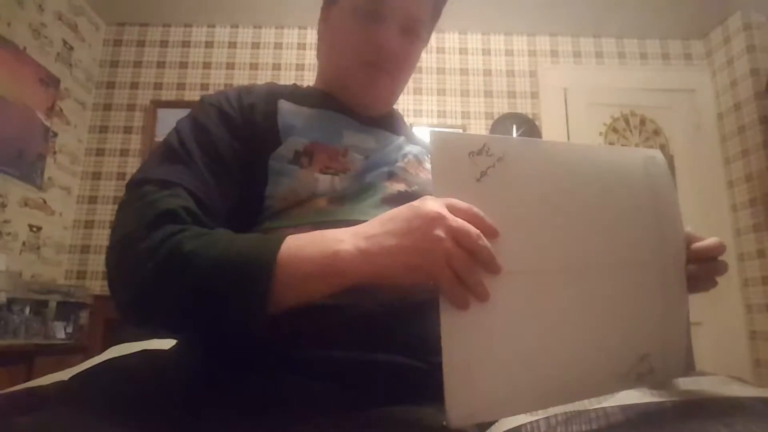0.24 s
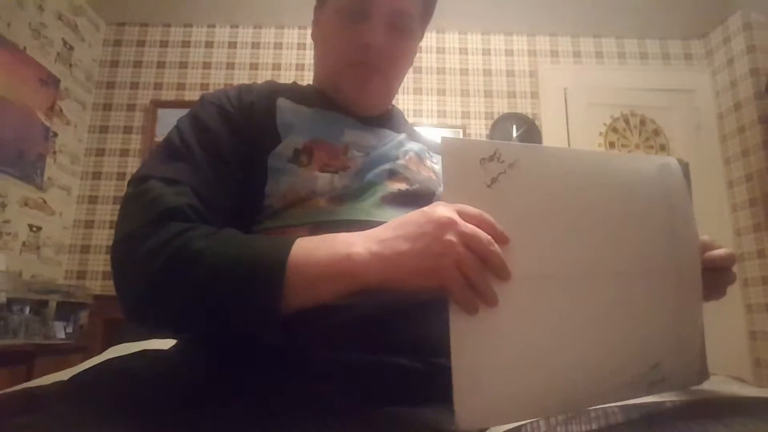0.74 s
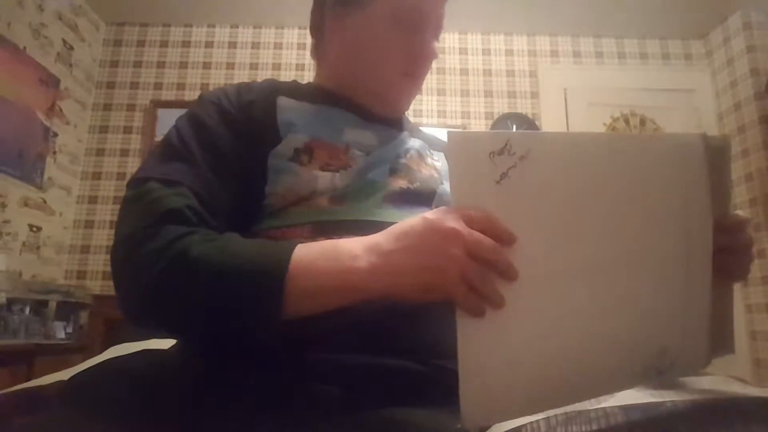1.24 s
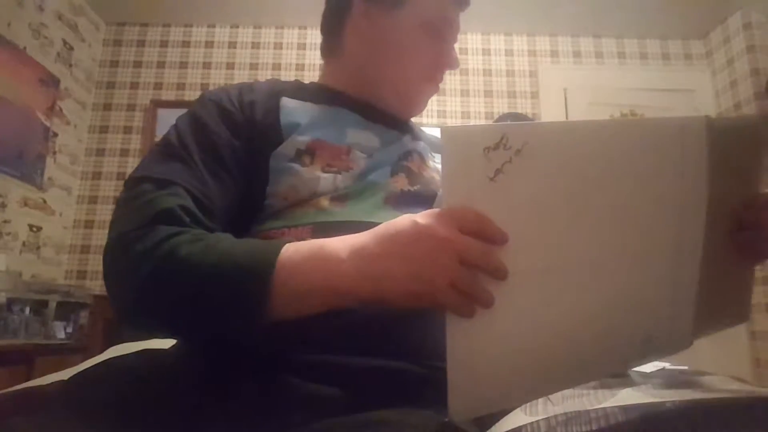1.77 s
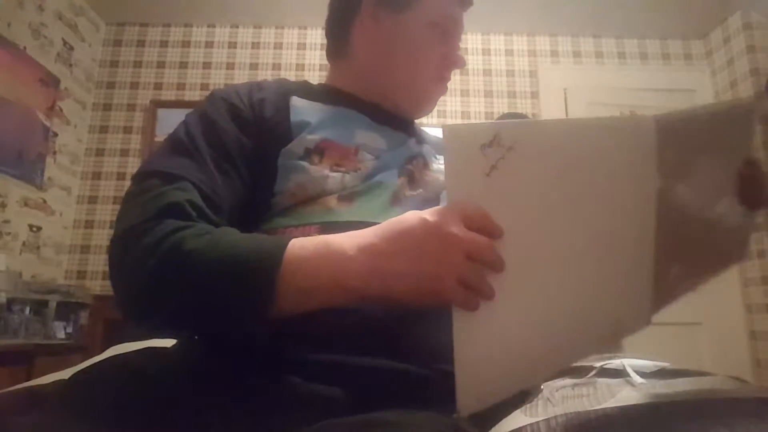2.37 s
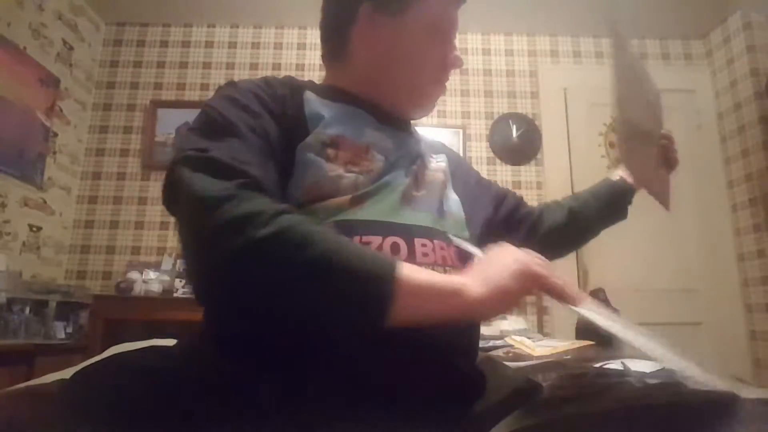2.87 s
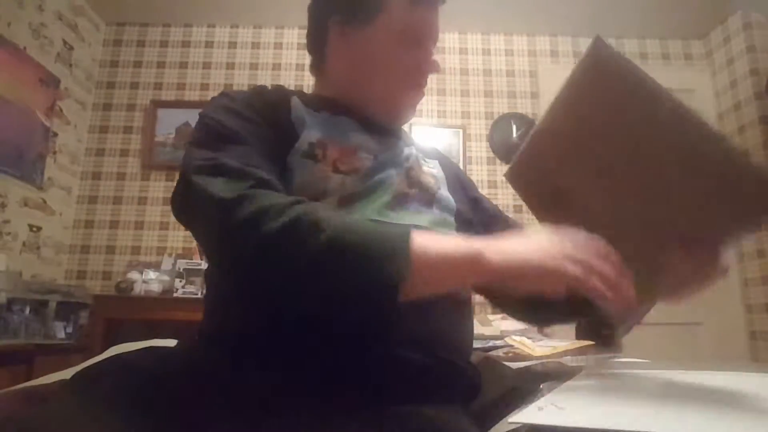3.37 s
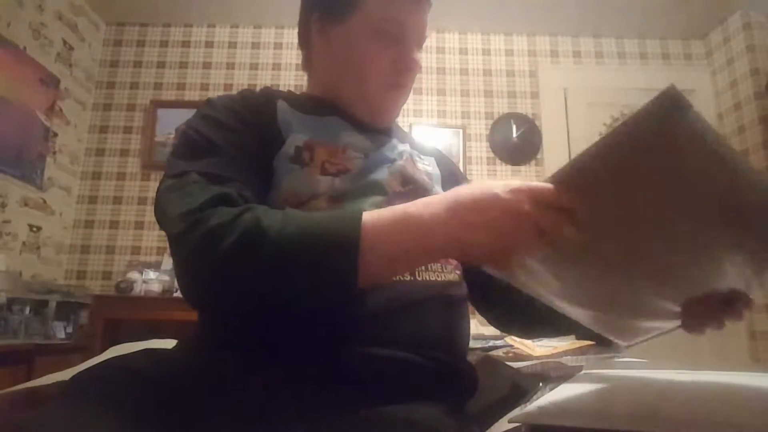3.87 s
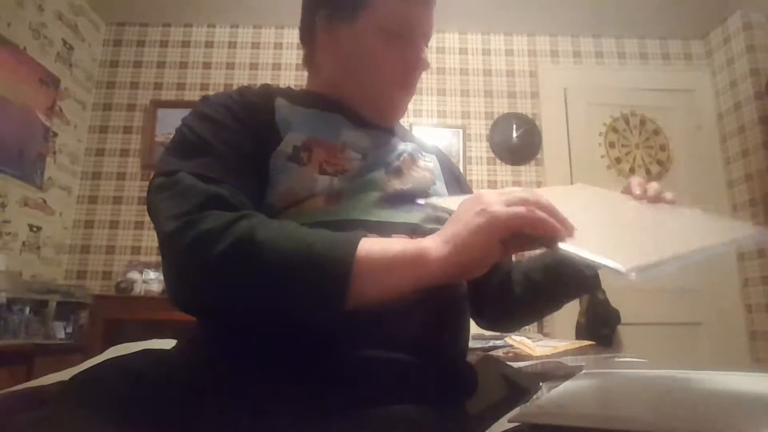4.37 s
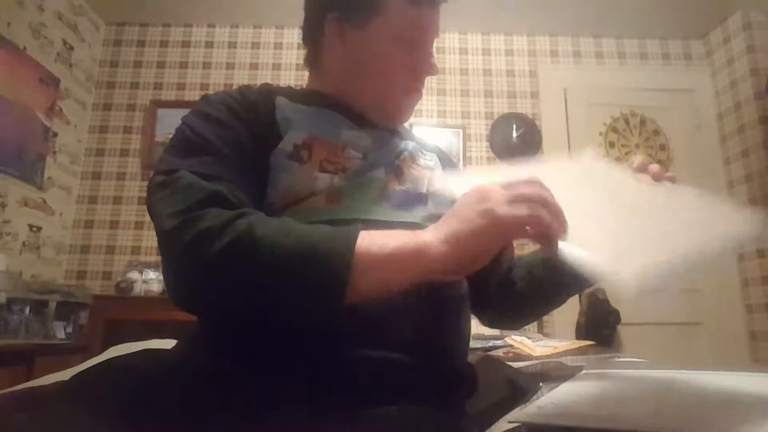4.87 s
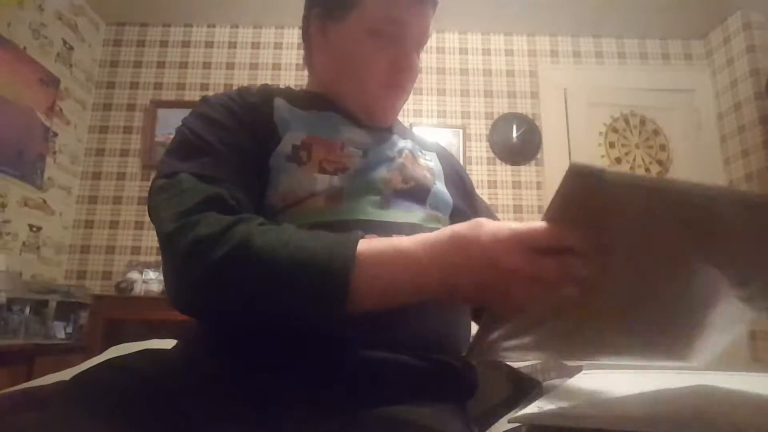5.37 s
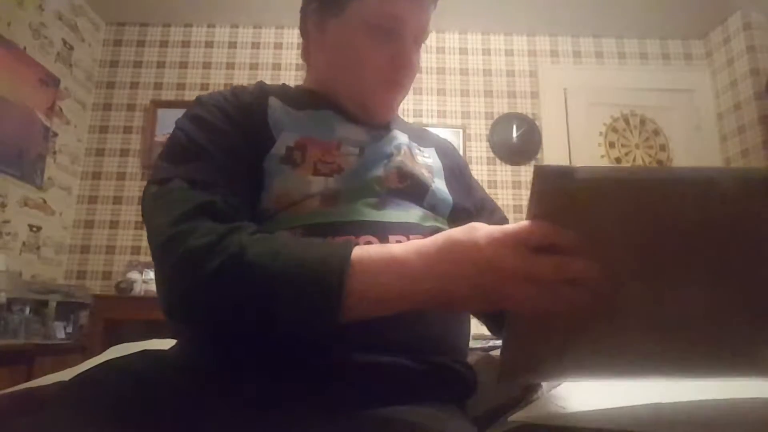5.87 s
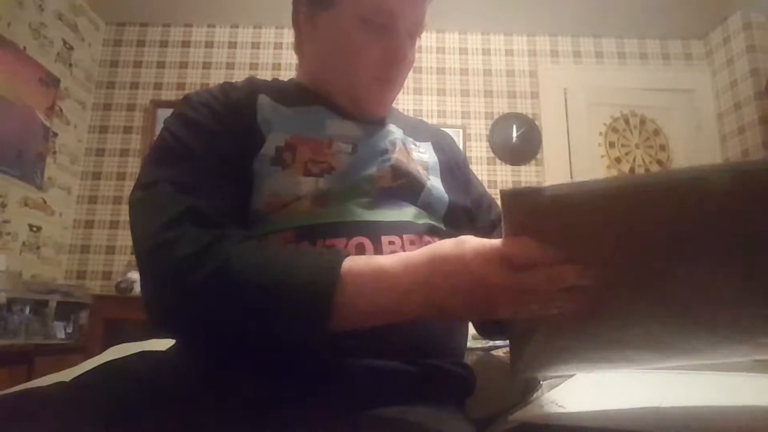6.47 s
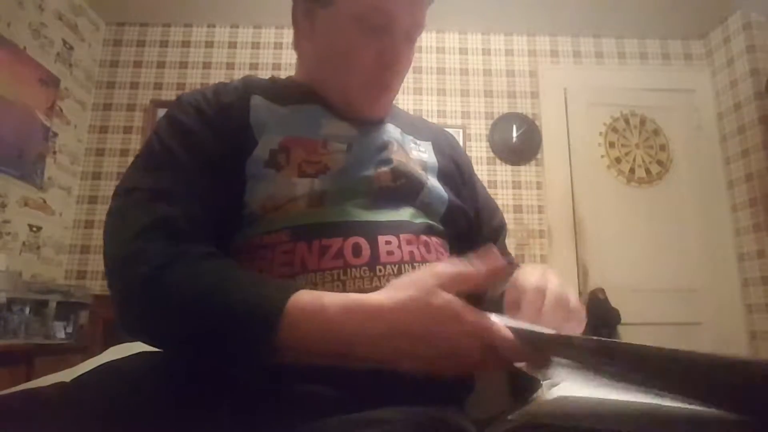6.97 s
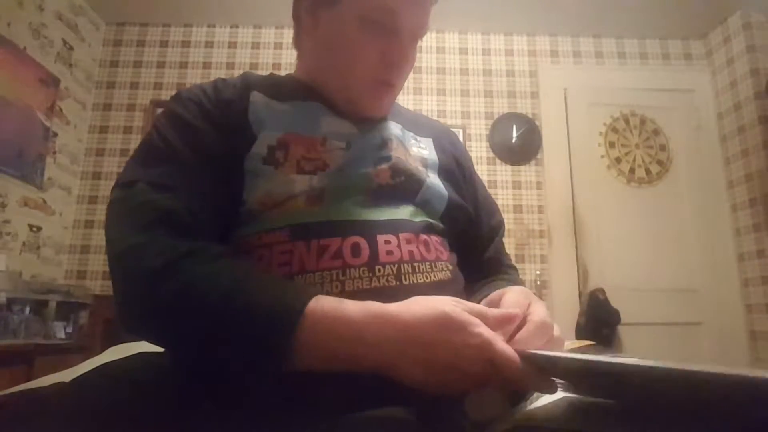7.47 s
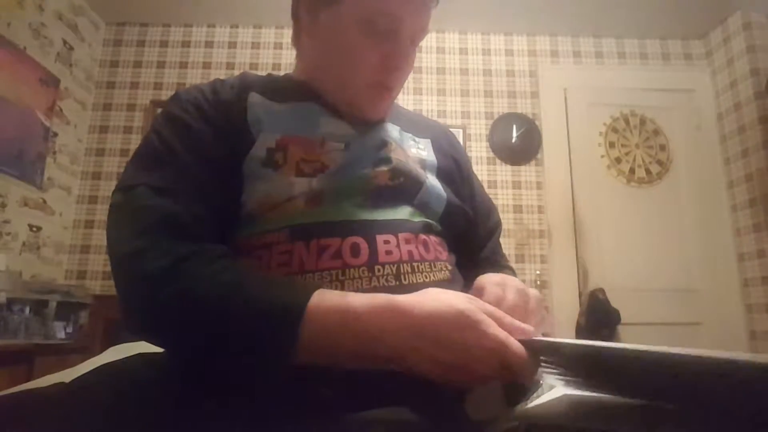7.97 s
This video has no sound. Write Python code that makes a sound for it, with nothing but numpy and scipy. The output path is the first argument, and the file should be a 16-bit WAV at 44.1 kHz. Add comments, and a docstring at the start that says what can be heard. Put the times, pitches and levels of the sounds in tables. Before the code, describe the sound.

Stiff card rustles and crackles as it slides out of a cardboard mailer, then is turned over and tapped in a small room.

```python
"""Small creases snap and fingers brush as a stiff card is handled in a small furnished room.
The card slides out of a cardboard mailer, which swishes down onto a blanket; then the card is turned
over, tapped and picked at. Stick-slip friction and cracking fibres drive the same board, air resonates
in the gap under the mailer, and soft blows ring low, damped notes. Two microphone ports hear it all
over room tone and a distant motor, and the left one pops once."""
import sys
import numpy as np
from scipy import signal
from scipy.fft import rfft, irfft, next_fast_len
from scipy.io import wavfile
from scipy.ndimage import uniform_filter1d, map_coordinates

SR = 44100
rng = np.random.default_rng(int(sys.argv[2]) if len(sys.argv) > 2 else 0)


def output_pcm(signal):
    """Save a mono or channel-first signal as 16-bit PCM at the path in sys.argv[1].

    Samples are clipped to [-1, 1] before scaling.
    """
    pcm = np.clip(np.atleast_2d(signal).T, -1, 1) * 32767
    wavfile.write(sys.argv[1], SR, np.round(pcm).astype(np.int16))


N = 362943

# Spectrum of the room tone and microphone hiss. Each row: frequency in Hz, relative density in dB.
TONE_SPECTRUM = [(20, -46), (52, -5.5), (200, -7), (440, -17.5), (600, -11.5), (1000, -18), (1400, -17.5),
                 (2300, -22), (3300, -18.5), (6500, -29.5), (10000, -43), (12800, -39), (15800, -25.5)]
# Likeness of that noise at the two ports. Each row: frequency in Hz, correlation from -1 to 1.
TONE_CORRELATION = [(60, 0.15), (240, 0.206), (950, -0.41), (3770, -0.48), (15000, -0.15)]
# Hum of a distant motor. Each row: frequency in Hz, resonator width in Hz, level in dB.
MOTOR_HUM = [(59, 45, -79), (118.3, 5.2, -81)]
# Short brushes of fingers and card. Each row: peak time in seconds, seconds to swell by 20 dB, seconds
# to fade by 20 dB, then relative levels in dB of friction, sheet flex, fibre hiss and silky sheen.
BRUSH_STROKES = [(0.0, .1, .3, -74, -58, -78, -78), (0.12, .15, .35, -60.5, -70, -75, -77),
                 (0.74, .15, .3, -57.5, -68, -72, -75), (0.95, .1, .2, -59, -61, -78, -78),
                 (1.07, .25, .25, -57, -62, -66.5, -65.5), (3.53, .3, .3, -71, -70, -80, -81),
                 (3.636, .004, .06, -49, -65, -50, -54), (3.815, .03, .05, -82, -74, -78, -73),
                 (3.96, .08, .22, -68, -78, -67, -61.5), (4.12, .07, .2, -60.5, -68, -70, -72),
                 (4.31, .3, .6, -71, -76, -73.5, -71.5), (4.98, .2, .28, -65, -76, -64.5, -62.5),
                 (5.26, .12, .12, -58, -64, -62, -66), (5.278, .016, .012, -40, -52, -52, -62),
                 (5.32, .06, .03, -53, -64, -64, -66), (5.345, .015, .09, -54, -68, -53, -57),
                 (5.53, .07, .14, -60, -62, -62, -62), (5.8, .4, .6, -71, -78, -74.5, -74),
                 (6.04, .08, .15, -64.5, -66, -73, -76), (6.16, .06, .11, -66, -61, -65, -68),
                 (6.27, .07, .09, -60, -68, -63.5, -65), (6.39, .06, .13, -68, -72, -70, -75),
                 (6.6, .08, .15, -64, -66, -72, -75), (6.71, .1, .1, -61, -66, -70, -73),
                 (6.88, .5, .3, -63, -63, -65, -66), (6.99, .08, .3, -64, -50, -61, -62),
                 (6.997, .016, .012, -42, -50, -50, -60), (7.17, .07, .05, -66, -60, -61, -64),
                 (7.22, .15, .22, -58, -61, -69, -73), (7.39, .1, .15, -62, -63, -73, -76),
                 (7.55, .1, .25, -68, -68, -78, -84), (7.66, .1, .12, -60, -64, -70, -74),
                 (7.96, .15, .3, -60, -58.5, -67, -69.5), (8.05, .2, .04, -62, -64, -65, -69),
                 (8.17, .1, .5, -66, -68, -79, -87)]
# Two long slides, one list each: card out of mailer, mailer onto blanket.
# Each row: time in seconds, then relative levels in dB of friction, flex, hiss and sheen.
SLIDE_PATHS = [
    [(1.21, -70, -62, -84, -85), (1.34, -54, -68.5, -70, -71), (1.78, -60.5, -68.5, -67, -65),
     (1.88, -57, -59, -62.5, -60.5), (1.99, -59.5, -62.5, -64, -61), (2.27, -56.5, -61.5, -64, -63),
     (2.38, -47, -52, -58, -58), (2.49, -62, -66, -57.5, -54.5), (2.53, -76, -80, -90, -92)],
    [(2.62, -66, -64, -78, -78), (2.69, -66, -64, -78, -76), (2.705, -57, -57, -63, -64),
     (2.79, -62, -72, -76, -78), (2.815, -60, -62, -63, -66), (2.89, -56, -63, -59.5, -62.5),
     (2.96, -49.5, -56.5, -59, -60), (3.05, -53, -60, -66.5, -68), (3.18, -61, -63, -78, -78),
     (3.34, -74, -78, -90, -90)],
]
# Colour of board and microphone. Each row: frequency in Hz, relative gain in dB.
BOARD_RESPONSE = [(50, -26), (130, -10.5), (360, -5), (550, -4), (700, -6.5), (950, -1), (1400, -4),
                  (2700, -7.5), (3400, -17), (4300, -19.5), (6600, -35.5), (8500, -32), (10000, -37.5),
                  (12600, -32.5), (14200, -39.5), (15800, -47)]
# Creases and film snapping. Each row: time in seconds, relative level in dB, panel note in Hz,
# bass, presence and treble in dB against the middle band, relative level of the crackle in dB.
CREASE_SNAPS = [(0.011, -36, 947, -8, -22, -22, -12), (0.033, -41, 613, -8, -0.5, -9, -24),
                (0.05, -39, 950, -6, -32, -35, -16), (0.361, -47, 1710, -10, -4, -14, -25),
                (0.416, -55.5, 806, -11, 8, 9, -24), (0.587, -38.5, 1096, -22, -1.1, -15, -30),
                (0.667, -45, 1880, -25, -25, -18, -15), (0.918, -40.5, 755, -14, -30, -27, -10),
                (1.066, -21.5, 1780, -30, -18, -35, -30), (1.07, -33, 760, -8, -12, -35, -14),
                (1.122, -29, 1750, -14, -9, -27.5, -9), (1.129, -30, 540, -8, -9, -30, -8),
                (1.16, -32.5, 560, -9, -14, -31, -9), (1.166, -31.5, 1000, -11, -12, -31, -11),
                (1.271, -43, 937, -38, -27, -23, -5), (2.354, -31, 900, -6, -8, -24, -8),
                (2.404, -31, 900, -29, -12, -24, -1.5), (2.432, -28, 2000, -4, -5, -17, -7),
                (2.45, -25, 990, -4, 2.5, -17, -12), (2.477, -23, 538, -7, -14, -24, -11),
                (2.708, -39, 1280, -9.5, 5, -30, -7), (3.004, -36, 515, -3, 6, -27, -22),
                (3.039, -35, 1130, -4.5, -13, -26, -19), (3.111, -27, 1100, -39, -14, -37, -10),
                (3.195, -45, 929, 3, 6, -30, -6), (3.412, -53, 824, -2.5, 12.5, 0.1, -21),
                (3.633, -42, 1700, -22, 1.5, -10, -25), (3.638, -34, 1120, -22, -4, -12, -18),
                (3.644, -36, 950, -22, -3, -12, -15), (3.651, -33, 1000, -20, -8, -14, -15),
                (3.806, -61.5, 546, 0.1, 4, 4, -9), (4.013, -40, 626, -7, -3.5, -19, -13),
                (4.06, -43.5, 526, -16, 4, -12, -27), (4.106, -34, 1124, -31, -5.5, -4.5, -16),
                (4.121, -45, 471, -16, 3, -7, -8), (4.166, -40, 930, -16, -6, -6, -22),
                (4.978, -40.5, 950, -25, -5.5, -9, -9), (5.279, -27, 935, -9, 6.5, -7, -25),
                (5.341, -26, 880, -5, 6.5, -3.5, -17), (5.524, -42.5, 594, -10, -1.1, -0.5, -11),
                (5.775, -56, 1040, 3, 2.1, -8, -17), (6.152, -43.5, 840, -6, 0.4, -8.5, -1.1),
                (6.251, -52, 455, 3, 7, 0.1, -5), (6.27, -45, 1120, -7, -5, 1.1, -18),
                (6.403, -49, 1020, 0.1, -1.1, -8.5, -6), (6.524, -56, 931, 2.1, 0.1, -1.1, -6),
                (6.569, -39, 870, 1.1, 0.4, -5, -19), (6.625, -49, 1060, -18, -3, -26, -11),
                (6.674, -50.5, 930, 11.5, -15, -22, -15), (6.786, -46.5, 457, 9, 11.5, 1.1, -14),
                (6.829, -39.5, 570, 3, -7, -4.5, -6), (6.874, -40, 830, -4, -8, -14, -15),
                (6.88, -38, 900, 3, 3, -9, -14), (6.909, -44.5, 1070, -17, 4, 5, -14),
                (6.948, -40, 920, -3, 6, 4, -15), (6.969, -45, 900, -8, 1.5, -8, -12),
                (6.998, -20.5, 937, -15, -14, -11, -25), (7.042, -50, 883, -14, 11, -20, -9),
                (7.098, -43, 895, -17, -13, -25, -28), (7.129, -38, 950, -8, -14, -18, -28),
                (7.133, -32.5, 1050, -8, -9, -18, -28), (7.147, -40, 420, 1.5, -14, -20, -22),
                (7.161, -24.5, 880, -2.5, -13, -9, -32), (7.2, -40.5, 953, -1.1, -5, -26, -12),
                (7.209, -40.5, 937, 1.5, -4, -22, -8), (7.233, -43, 800, -3, 1.5, -9, -12),
                (7.25, -41, 910, -19, 3, -6, -15), (7.276, -44, 850, -8, -9, -15, -20),
                (7.281, -40, 800, -6, -2.1, -12, -16), (7.303, -50, 750, -10.5, -6, -4, -20),
                (7.457, -49, 540, 0.4, -6, -17, -25), (7.491, -36.5, 923, -20, 1.1, -1.1, -30),
                (7.63, -34, 1100, -4, -2.1, -0.4, -14), (7.659, -34.5, 865, 2.1, 10, -8, -18),
                (7.792, -62, 848, 17, -18, -22, -19), (7.866, -49.5, 910, -8, 1.1, -1.1, -15),
                (7.905, -36, 549, 4.5, -4.5, -28, -14), (7.929, -35, 930, -9.5, 1.1, -19, -10),
                (8.061, -29, 970, -18, 5, -16, -17), (8.164, -41.5, 850, -4, -10, -14, -17)]
# The mailer bumping on the bed. Each row: start in seconds, relative level in dB, pitch in Hz.
MAILER_BUMPS = [(0.037, -49, 58), (2.497, -37, 117), (3.037, -45, 124), (3.209, -39.5, 72.5),
                (5.349, -46, 205), (6.813, -36, 103.4), (6.833, -31.5, 78.1), (6.857, -45, 83.4)]
# Air under the falling mailer. Each row: time in seconds, relative level in dB, gap resonance in Hz.
AIR_GAP = [(2.69, -67, 1900), (2.704, -50, 2000), (2.745, -46, 2100), (2.8, -62, 2200),
           (2.812, -43.5, 2350), (2.9, -49, 2120), (2.985, -54, 1950), (3.005, -46, 1200),
           (3.09, -47.5, 1070), (3.18, -62, 1000)]
# Finger pads on the board. Each row: contact in seconds, relative level in dB, pitch in Hz.
FINGER_TAPS = [(5.805, -36.5, 325), (6.006, -43.5, 336), (6.099, -33, 330), (6.219, -36.5, 342),
               (6.418, -37.5, 334), (6.556, -47.5, 293), (6.701, -34, 344)]
# Imbalance of the ports. Each row: frequency in Hz, level of left over right in dB.
PORT_BALANCE = [(60, -0.5), (110, 7.5), (200, 5), (380, 5.5), (700, 4.5), (1290, 2), (2380, 9.5),
                (4400, -5.5), (8120, 3), (15000, 11.5)]
# Phase bent by the housing. Each row: frequency in Hz, extra lead of the left port in radians.
PORT_PHASE = [(300, -0.11), (950, -1.19), (1400, 1), (1900, 0.32), (2400, 0.64), (3300, -2.3),
              (5000, -0.33)]
# Path difference as the card moves. Each row: time in seconds, delay of the right port in milliseconds.
PORT_DELAY = [(0, .23), (2.6, 0.26), (2.9, 0.067), (3.1, 0.29), (3.6, 0.11), (3.9, .28), (5.6, 0.3),
              (5.9, 0.23), (6.598, 0.17), (7.0, 0.16), (8.23, 0.13)]
# Reverberation of the room. Each row: frequency in Hz, seconds to decay by 60 dB.
ROOM_T60 = [(200, 0.2), (600, 0.17), (1500, 0.098), (4000, 0.16), (10000, 0.22)]
HELD_DB = (-80, -79, -86, -86)  # the card merely held: friction, flex, hiss, sheen


def gain_of(db):
    """Amplitude grows tenfold with every 20 dB."""
    return 10 ** (np.asarray(db) / 20)


def unit_rms(x):
    """Normalisation to a mean power of one."""
    return x / np.sqrt(np.mean(x ** 2) + 1e-20)


def at_frequency(points, hz):
    """Interpolation on a logarithmic frequency axis."""
    f, value = np.transpose(points)
    return np.interp(np.log(hz + 1), np.log(f + 1), value)


def add(mix, s, sound):
    """Superposition: a sound joins the mix at s seconds."""
    part = mix[..., round(s * SR):][..., :sound.shape[-1]]
    part += sound[..., :part.shape[-1]]


def resonant_noise(noise, hz, width_hz):
    """Two resonators in series leave a band at rms 1; each shifts hz to zero, smooths and shifts back."""
    carrier = np.exp(2j * np.pi * np.cumsum(hz * np.ones(len(noise))) / SR)
    pole = np.exp(-np.pi * width_hz / SR)
    for _ in range(2):
        noise = 2 * (carrier * signal.lfilter([1 - pole], [1, -pole], noise / carrier + 1e-18)).real
    return unit_rms(noise)


def room_tone(level_db=-69.5, patchy_db=-2.0):
    """Partly coherent noise: room air and microphone hiss lie over a motor's narrow-band hum."""
    frames, hz = N // 512 + 5, np.fft.rfftfreq(2048, 1 / SR)
    a, b, c, d, patches = rng.standard_normal((frames, len(hz), 5)).T
    left, unrelated = a + 1j * b, c + 1j * d
    patches = unit_rms(uniform_filter1d(uniform_filter1d(patches, 20, 0), 8, 1))
    same = at_frequency(TONE_CORRELATION, hz)[:, None]
    spectra = np.array([left, same * left + np.sqrt(1 - same ** 2) * unrelated])
    spectra *= gain_of(at_frequency(TONE_SPECTRUM, hz)[:, None] + patchy_db * patches)
    air = unit_rms(signal.istft(spectra, nperseg=2048, noverlap=1536)[1][:, :N])
    hum = sum(gain_of(db) * resonant_noise(rng.standard_normal(N), f, width) for f, width, db in MOTOR_HUM)
    return gain_of(level_db) * air + hum


def rubbing_levels(step=32):
    """Incoherent sources add in power: grip, slides and brushes sum to four level curves in dB."""
    t = np.arange(0, N + step, step) / SR
    power = gain_of(2 * np.array(HELD_DB))[:, None] * np.ones(len(t))
    for slide in SLIDE_PATHS:
        s, *levels_db = np.transpose(slide)
        sliding = (t >= s[0]) & (t <= s[-1])
        power += [gain_of(2 * np.interp(t, s, db)) * sliding for db in levels_db]
    for s, swell_s, fade_s, *levels_db in BRUSH_STROKES:
        below_db = 20 * np.where(t < s, (s - t) / swell_s, (t - s) / fade_s)
        power += gain_of(2 * (np.array(levels_db)[:, None] - below_db))
    return t, 10 * np.log10(power)


def friction(times, levels_db, slips_per_s=1500, spread_db=3.0, slip_share=0.42, flutter_db=1.8):
    """Stick-slip friction: tiny uneven slips and smooth hiss drive five bands as the pressure flutters."""
    friction_db, flex_db, hiss_db, sheen_db = levels_db
    t = np.arange(N) / SR
    strengths = gain_of(spread_db * np.minimum(rng.exponential(1, N), 5))
    slipping = rng.random(N) < slips_per_s / SR
    slips = unit_rms(strengths * slipping * rng.choice([-1., 1.], N))
    fibres = np.sqrt(slip_share) * slips + np.sqrt(1 - slip_share) * rng.standard_normal(N)
    flutter = unit_rms(uniform_filter1d(uniform_filter1d(rng.standard_normal(N), 500), 500))
    bands_db = (flex_db, friction_db + 1.0, friction_db - 2.6, hiss_db - 3.0, sheen_db - 3.5)
    envelopes_db = np.array([np.interp(t, times, db) for db in bands_db])
    return fibres * gain_of(envelopes_db + flutter_db * flutter)


def board(drive, crossovers_hz=(500, 1500, 5000, 10000), size=4096):
    """Forced vibration: bass, middle, presence, treble and air bands drive one minimum-phase response."""
    def bands(hz):
        lowpasses = [1 / np.sqrt(1 + (hz / edge) ** 6) for edge in crossovers_hz]
        return np.diff([np.zeros_like(hz), *lowpasses, np.ones_like(hz)], axis=0)
    hz, padded = abs(np.fft.fftfreq(size, 1 / SR)), next_fast_len(N + size)
    colour = gain_of(at_frequency(BOARD_RESPONSE, hz))
    band_rms = np.sqrt(np.mean((colour * bands(hz)) ** 2, axis=1, keepdims=True))
    spectra = rfft(drive, padded) * bands(np.fft.rfftfreq(padded, 1 / SR)) / band_rms
    force = irfft(spectra.sum(0), padded)[:N]
    impulse_response = np.fft.ifft(np.exp(signal.hilbert(np.log(colour)).conj())).real[:size // 2]
    return signal.oaconvolve(force, impulse_response)[:N]


def crease_snaps(strain_s=0.0057, crackle_t60=0.096, swell_s=0.0012, panel_t60=0.025,
                 edge_hz=2800, edge_t60=0.016):
    """Release of elastic energy: fibres strain, crack and crackle out; the freed panel rings briefly."""
    crack_s = np.array([.003, .002, .0012, .0007, .0006])  # the higher the band, the shorter the crack
    lead = 900  # samples of straining before the crack
    drive, rings = np.zeros((5, N + lead)), np.zeros(N)
    t = np.arange(-lead, 4500) / SR
    after = np.maximum(t, 0)
    for row, (noise, uneven) in zip(CREASE_SNAPS, rng.standard_normal((len(CREASE_SNAPS), 2, len(t)))):
        s, db, hz, bass_db, presence_db, treble_db, crackle_db = row
        crack = np.exp(-after / crack_s[:, None]) * np.sign(noise) * (t >= 0)
        crack[:, lead] *= gain_of(2.1)  # the first break is the hardest
        strain = gain_of(crackle_db - 2.5) * np.exp((t - after) / strain_s)
        crackle = gain_of(crackle_db - 60 * after / crackle_t60)
        clumps = unit_rms(gain_of(4.0 * unit_rms(uniform_filter1d(uneven, 130))))  # fibres tear in bunches
        tearing = gain_of(1.5) * noise * clumps * np.where(t < 0, strain, crackle)
        bands_db = np.array([bass_db, 0, presence_db, treble_db, treble_db - 17.0])
        add(drive, s, (crack + tearing) * gain_of(db - 3.7 + bands_db[:, None]))
        # The stiff edge rings at once where the crack is bright; the panel's note swells in just after.
        gripped_hz = edge_hz * (1 + 0.05 * np.clip(uneven[0], -2, 2))  # each grip stiffens it differently
        edge = gain_of(presence_db - 0.4 - 60 * after / edge_t60) * np.sin(2 * np.pi * gripped_hz * after)
        panel = (1 - np.exp(-(after / swell_s) ** 2)) * np.sin(2 * np.pi * hz * after)
        decay = gain_of(db + 1.2 - 60 * after / panel_t60)
        add(rings, s, (decay * (panel + edge))[lead:])
    return drive[:, lead:], rings


def mailer_bumps(rise_s=0.0041, t60=0.11):
    """Damped oscillation: a padded push starts softly and dies within a few low cycles."""
    out, t = np.zeros(N), np.arange(9000) / SR
    for s, db, hz in MAILER_BUMPS:
        envelope = gain_of(db - 60 * t / t60) * (1 - np.exp(-t / rise_s))
        add(out, s, envelope * np.sin(2 * np.pi * hz * t))
    return out


def mailer_swish(width_hz=95, upper_ratio=1.3, upper_db=-6.5):
    """Cavity resonance: noise in the air gap's broad pair of modes narrows to a whistle as pitch falls."""
    out = np.zeros(N)
    s, db, hz = np.transpose(AIR_GAP)
    t = np.arange(s[0], s[-1], 1 / SR)
    pitch = np.interp(t, s, hz)
    whistle = resonant_noise(rng.standard_normal(len(t)), pitch, width_hz)
    lower = resonant_noise(rng.standard_normal(len(t)), pitch, 5 * width_hz)
    upper = resonant_noise(rng.standard_normal(len(t)), pitch * upper_ratio, 4 * width_hz)
    openness = np.clip((pitch - 1200) / 600, 0, 1)
    tone = np.sqrt(1 - openness) * whistle + np.sqrt(openness) * (lower + gain_of(upper_db) * upper)
    add(out, s[0], tone * gain_of(np.interp(t, s, db)) * signal.windows.tukey(len(t), .05))
    return out


def microphone_pop(start_s=3.361376, step_db=0.5, rise_s=.000033, ring_hz=91, damping=.49, leak_hz=56):
    """Step response: high-pass stages pull a sudden jump at the left input back with an undershoot."""
    out, t = np.zeros((2, N)), np.arange(8000) / SR
    omega = 2 * np.pi * ring_hz
    denominator = np.polymul([1, 2 * damping * omega, omega ** 2], [1, 2 * np.pi * leak_hz])
    highpass = signal.bilinear([1, 0, 0, 0], denominator, SR)
    step = 1 - (1 + t / rise_s) * np.exp(-t / rise_s)
    add(out[0], start_s, gain_of(step_db) * signal.lfilter(*highpass, step))
    return out


def finger_taps(sink_s=0.0024, rise_s=0.0005, damp_s=0.0066, overtone_ratio=2.15, rasp_hz=700):
    """Soft impact: the pad sinks in and excites a low note, an overtone and a rasp, damped by the hand."""
    out, t = np.zeros(N), np.arange(3000) / SR
    envelope = (1 - np.exp(-t / rise_s)) * np.exp(-(t / damp_s) ** 2)
    for s, db, hz in FINGER_TAPS:
        note = np.sin(2 * np.pi * hz * t)
        overtone = gain_of(-10.5) * envelope * np.sin(2 * np.pi * overtone_ratio * hz * t)
        rasp = gain_of(-12.0) * resonant_noise(rng.standard_normal(len(t)), rasp_hz, width_hz=rasp_hz)
        add(out, s + sink_s, -gain_of(db) * envelope * (note + overtone + rasp))
    return out


def ports(x):
    """Path difference: the right port hears the card later, and each port has its own colour and phase."""
    size = next_fast_len(N + 4096)
    hz = np.fft.rfftfreq(size, 1 / SR)
    half = gain_of(at_frequency(PORT_BALANCE, hz) / 2) * np.exp(.5j * at_frequency(PORT_PHASE, hz))
    left, right = irfft(rfft(x, size) * np.array([half, 1 / half]), size)[:, :N]
    delay_samples = np.interp(np.arange(N) / SR, *np.transpose(PORT_DELAY)) * SR / 1000
    return np.array([left, map_coordinates(right, [np.arange(N) - delay_samples], order=3)])


def room(x, coherent_below_hz=600):
    """Reverberation: sparse echoes die at each band's own rate; long waves reach both ports alike."""
    echoes = np.zeros((2, SR // 4))
    slots = np.arange(150, SR // 4 - 20, 20)  # one echo in every 20 samples
    arrivals = slots + rng.integers(0, 20, (2, len(slots)))
    np.put_along_axis(echoes, arrivals, rng.choice([-1., 1.], arrivals.shape), 1)
    hz, t, spectra = signal.stft(echoes, SR, nperseg=256)
    same = 1 / (1 + (hz[:, None] / coherent_below_hz) ** 4)
    spectra[1] = same * spectra[0] + np.sqrt(1 - same ** 2) * spectra[1]
    decay = gain_of(-60 * t / at_frequency(ROOM_T60, hz)[:, None])
    tail = signal.istft(spectra * decay, SR, nperseg=256)[1]
    return signal.fftconvolve(x[None], tail / np.linalg.norm(tail[0]), axes=1)[:, :N]


def moving_echoes(x, turns_per_s=1.5):
    """A moving source changes its echo paths: three sets of echoes take turns at constant total power."""
    angle = np.pi * turns_per_s * np.arange(N) / SR
    return sum(room(x * np.sqrt(2 / 3) * np.cos(angle + k * np.pi / 3)) for k in range(3))


def scene():
    """Superposition at two ports: direct sound, the rubbing edge, echoes, room tone and the pop."""
    snap_drive, rings = crease_snaps()
    rubbing = rubbing_levels()
    rustle = board(friction(*rubbing) + snap_drive) + mailer_swish()
    knocks = rings + finger_taps() + mailer_bumps()
    # The long rubbing edge reaches each port by other paths, so its upper bands are unrelated there.
    edge_bands = gain_of([[-30], [-12], [-4], [-3], [-3]])
    edge = [board(friction(*rubbing) * edge_bands) for port in range(2)]
    direct = gain_of(-3.0) * ports(rustle + knocks)
    echoes = gain_of(-6.0) * moving_echoes(rustle + gain_of(-5.0) * knocks)
    return direct + edge + echoes + room_tone() + microphone_pop()


def record(dry, cutoff_hz=15800):
    """Band limiting: a steep low-pass filter removes the highest treble."""
    lowpass = signal.firwin(511, cutoff_hz, window=("kaiser", 9), fs=SR)
    return signal.oaconvolve(dry, lowpass[None], "same")


dry = scene()
out = record(dry)
output_pcm(out)
```